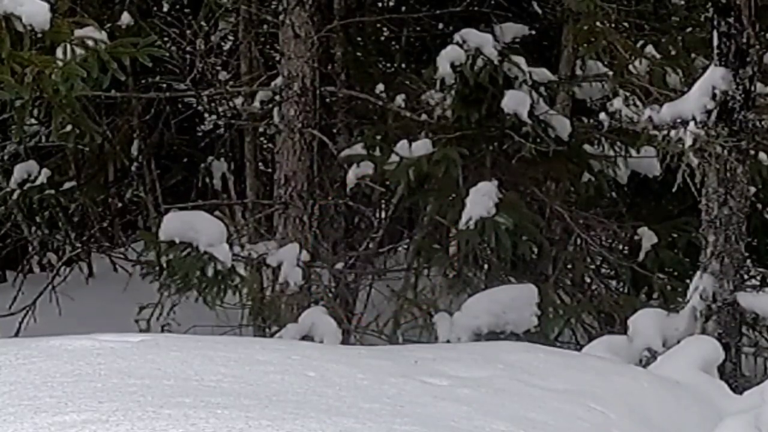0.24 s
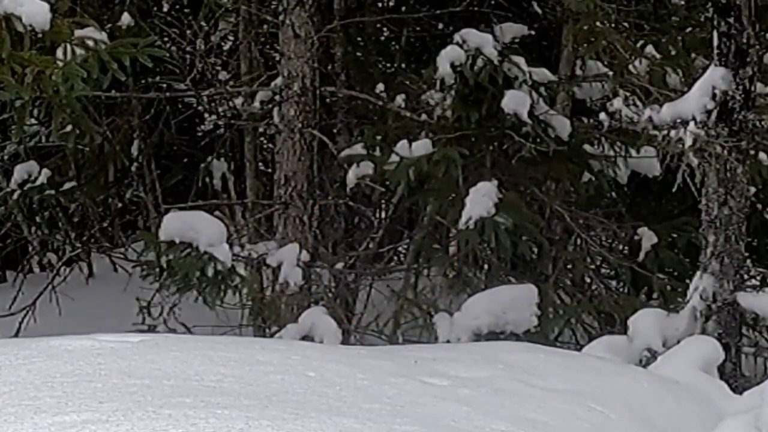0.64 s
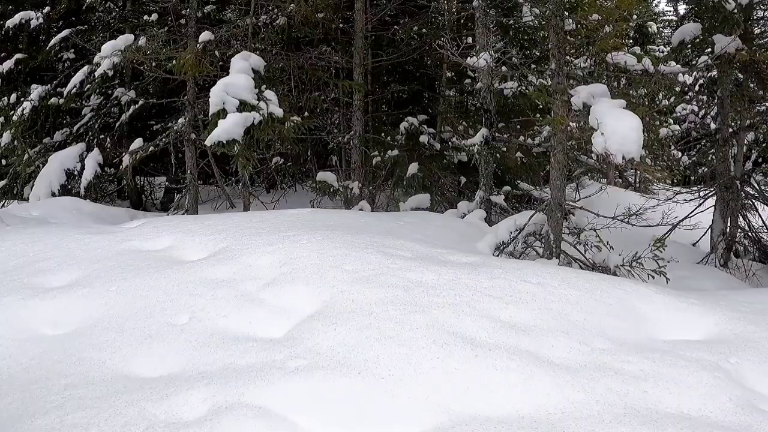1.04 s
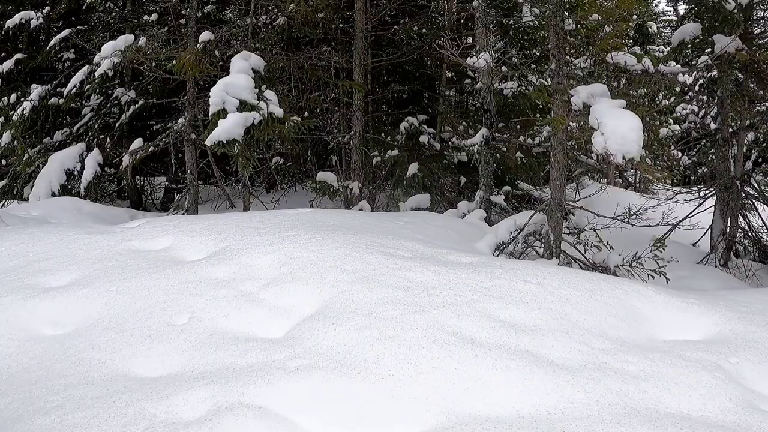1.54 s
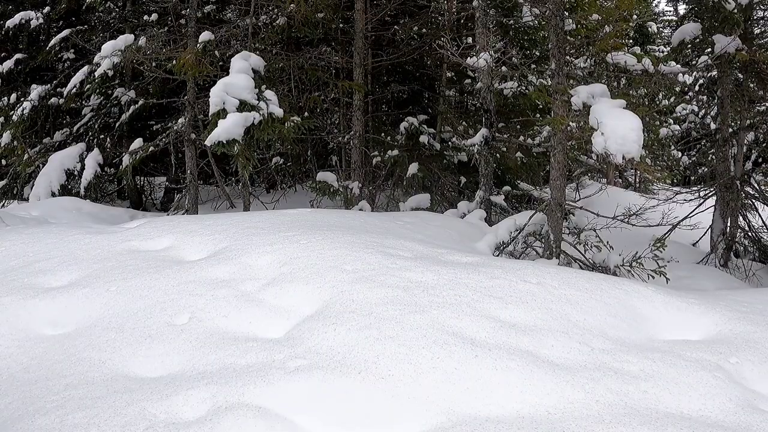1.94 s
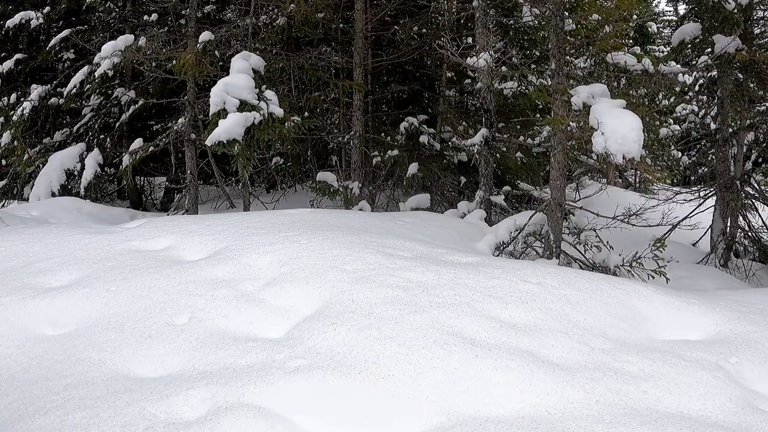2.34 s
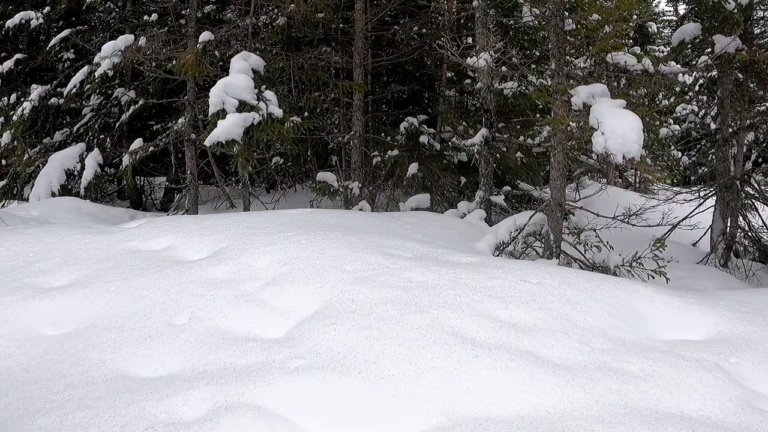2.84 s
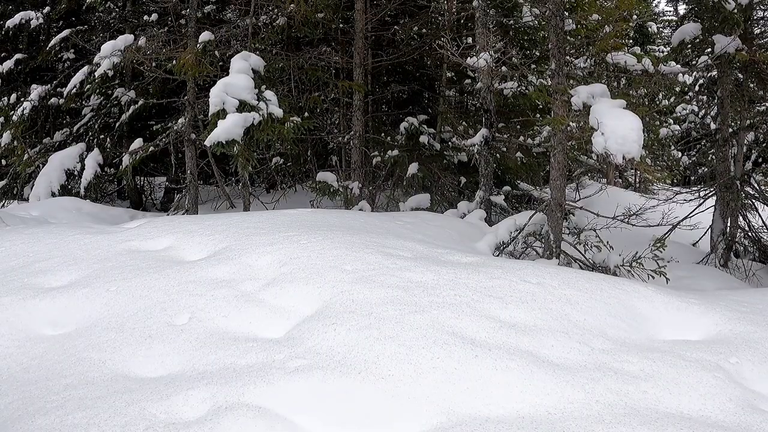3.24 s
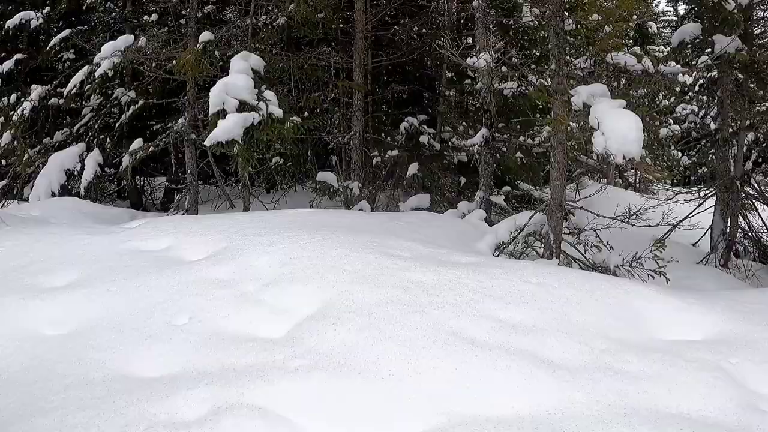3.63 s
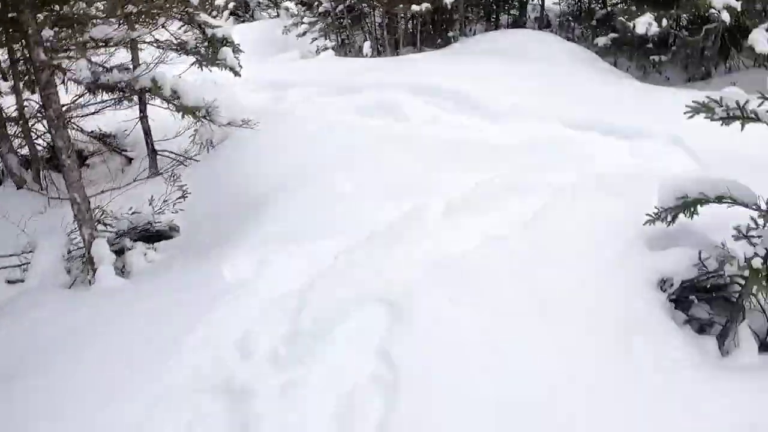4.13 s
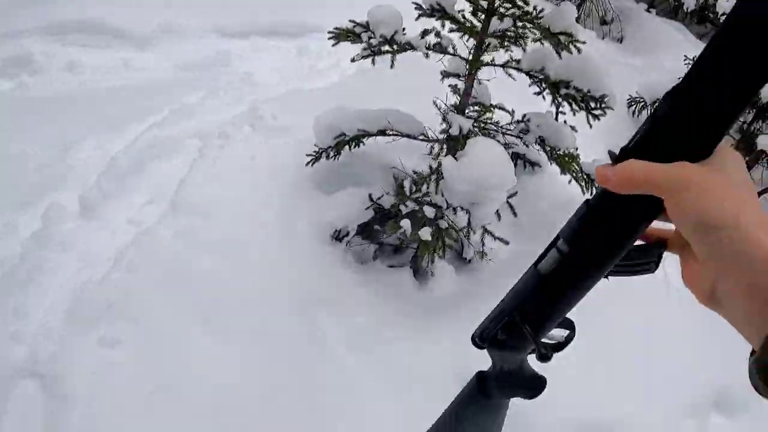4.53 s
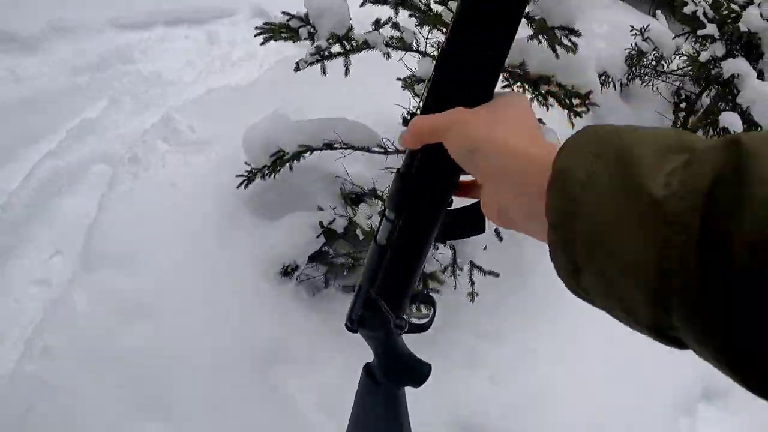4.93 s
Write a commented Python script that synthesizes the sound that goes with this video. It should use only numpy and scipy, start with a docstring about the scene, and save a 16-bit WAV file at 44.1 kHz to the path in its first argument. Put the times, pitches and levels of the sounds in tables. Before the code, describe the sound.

Close, sharp metal clicks and scrapes of a rifle action over soft cloth rustle, then a sudden cut to loud wading through snow.

```python
"""Still, snowy woods: close to a small camera, a rifle bolt is worked open and shut twice.
Clicks and scrapes ring the modes of the metal and stock; the trees return a short echo as fading noise.
Grainy noise makes coat cloth rustle, and slow, low noise is air buffeting the microphone.
After a cut the wearer wades through deep snow: rumble, crunching bursts of grains, pops and dull knocks."""
import sys
import numpy as np
from scipy import signal
from scipy.fft import rfft, irfft
from scipy.io import wavfile
from scipy.ndimage import uniform_filter1d

SR = 44100
rng = np.random.default_rng(int(sys.argv[2]) if len(sys.argv) > 2 else 0)


def wav_record(signal):
    """Record a signal, one row per channel, as 16-bit PCM in the file named by sys.argv[1]."""
    frames = np.transpose(np.atleast_2d(signal))
    bounded = np.clip(frames, -1, 1)
    # unit amplitude maps onto the largest positive 16-bit level
    quanta = np.round(bounded * 32767).astype(np.int16)
    wavfile.write(sys.argv[1], SR, quanta)


N = 228321
T = np.arange(N) / SR

# where the near sounds sit: (time [s], left minus right [dB], basic width as side over mid [ratio])
STAGE = [(0, 0, .1), (1.0, 0, .08), (1.5, -1, .12), (2.0, 0, .3), (2.7, 2, .4), (3.6, 1.5, 0.5),
         (3.945, 0, .45), (3.955, 1, .3), (4.2, 0, .2), (5.18, 0, .1)]
# cloth, and snow after the cut: (time [s], rustle [dB], low crunch [dB], treble [dB])
RUSTLE_LEVELS = [
    [(0, -62.5, -108, -79.5), (.234, -71, -82.5, -85), (.5, -70, -75, -76), (.766, -77, -82.5, -81),
     (1.1, -70, -75, -76.5), (1.55, -73, -90, -81.5), (1.756, -90.5, -88.5, -93.5), (1.95, -89.5, -93, -92),
     (2.15, -76.5, -80, -76), (2.43, -76.5, -83, -81), (2.65, -70.5, -74.5, -77),
     (2.806, -63.5, -67, -71.5), (2.9, -65.5, -73, -75.5), (2.92, -73.5, -89.5, -79.5),
     (3.182, -74, -77.5, -75.5), (3.5, -77, -77, -80), (3.852, -73, -74, -76.5), (3.945, -69, -66.5, -72.5)],
    [(3.955, -65, -53.5, -63.5), (4.095, -47, -42.5, -58.5), (4.16, -55.5, -50, -62),
     (4.419, -52, -48.5, -62), (4.53, -49, -51, -55), (4.62, -42, -40, -51.5), (4.77, -57, -46, -60),
     (4.92, -55.5, -50, -65.5), (5.12, -50.5, -53, -55.5)],
]
# ways the receiver, bolt and stock can ring: (pitch [Hz], level [dB], free ring time to -60 dB [s])
RIFLE_MODES = [(456, -5.5, 0.079), (560, 2.5, 0.037), (626, -9.5, 0.014), (1030, -21.5, 0.14),
               (1095, 5.5, 0.041), (1140, -8.5, 0.05), (1630, -11.5, .045), (1670, -2.5, 0.027),
               (1873, 2, 0.038), (2237, -14.5, 0.021), (2682, 1.5, .04), (3016, 3.5, 0.065),
               (3630, -6.5, 0.0083), (4041, 4.5, 0.023), (4500, 3, 0.016), (4790, 2.5, 0.016),
               (5930, 4, 0.0067), (6370, 1, 0.0061), (6820, -2.5, .02), (7120, 4.5, 0.055),
               (8115, 3, 0.025), (8870, -8, 0.033), (9750, 3.5, .015), (10800, -11.5, 0.014),
               (11500, -10.5, .012)]
# two cuts of the edit: (time [s], half length of the silence [s])
CUTS = [(.9365, .0055), (3.949, .002)]
SNOW_START_S = CUTS[1][0]


def undb(db):
    """Turn decibels into a plain gain."""
    return 10 ** (np.asarray(db, float) / 20)


def unit(x):
    """Scale to an average (RMS) level of 1."""
    return x / np.sqrt(np.mean(x ** 2))


def column(table, order, s):
    """Read one table column at time s, with straight lines between the rows."""
    rows = np.array(table)
    return np.interp(s, rows[:, 0], rows[:, order])


def curve(tables, order):
    """Gain over time along one dB column of joined tables."""
    return undb(column(np.vstack(tables), order, T))


def band(x, lo_hz, hi_hz):
    """Keep mainly the sound between two pitches."""
    return signal.sosfilt(signal.butter(2, [lo_hz, hi_hz], "band", fs=SR, output="sos"), x)


def shaped(x, tone):
    """Colour a sound by (pitch [Hz], gain [dB]) points."""
    hz, db = np.transpose(tone)
    f = np.arange(x.shape[-1] // 2 + 1) * SR / x.shape[-1] + 1
    gain = undb(np.interp(np.log(f), np.log(hz), db))
    return irfft(rfft(x) * gain, x.shape[-1])


def ring(x, hz, t60):
    """One mode, struck by x, that falls 60 dB in t60 seconds."""
    pole = np.exp(2j * np.pi * hz / SR - np.log(1000) / (t60 * SR))
    return signal.lfilter([1], [1, -pole], x).imag


def walk(rate):
    """Smooth random wandering with RMS 1, from new random values at this rate per second."""
    k = int(SR / rate)
    steps = np.repeat(rng.standard_normal(N // k + 1), k)
    return unit(uniform_filter1d(uniform_filter1d(steps, k), k)[:N])


def grit(scatter_db, spread):
    """Noise of tiny grains with uneven sizes, placed and widened by the stage."""
    chance = np.repeat(rng.exponential(size=N // 24 + 1), 24)[:N]
    size = undb(np.minimum(scatter_db * chance, 9))
    mid, side = rng.standard_normal((2, N)) * size
    side = side * spread * column(STAGE, order=2, s=T)
    pan_db = column(STAGE, order=1, s=T) / 2
    return np.array([(mid + side) * undb(pan_db), (mid - side) * undb(-pan_db)])


def add(out, s, x, pan_db):
    """Mix x in at s seconds, pan_db louder on the left than on the right."""
    i = int(s * SR)
    x = x[..., :N - i]
    out[:, i:i + x.shape[-1]] += x * undb([[pan_db / 2], [-pan_db / 2]])


def rustle():
    """Grains of cloth and packed snow in three registers, each flickering."""
    # colour of the middle register: (pitch [Hz], gain [dB])
    rustle_tone = [(350, -28.5), (600, -6), (832, -9.5), (1020, -0.5), (1280, -2.5), (1500, -1), (2180, -6),
                   (3400, -13), (4420, -35), (7480, -120)]
    # colour of the treble: (pitch [Hz], gain [dB])
    treble_tone = [(1650, -30.5), (2800, -7.5), (3260, -4), (4500, -2.5), (7550, -9), (9400, -18.5),
                   (12400, -21.5), (14100, -27), (16000, -70)]
    low = unit(band(grit(0.17, 0.42), 140, 620)) * undb(2.0 * walk(25))
    mid = unit(shaped(grit(0.66, 1.0), rustle_tone)) * undb(2.0 * walk(14))
    top = unit(shaped(grit(1.3, 1.2), treble_tone)) * undb(0.8 * walk(30))
    mid = curve(RUSTLE_LEVELS, order=1) * mid
    low = curve(RUSTLE_LEVELS, order=2) * low
    return mid + low + curve(RUSTLE_LEVELS, order=3) * top


def buffet():
    """Air and movement press on the microphone: gusty low noise, nearly the same on both sides."""
    # level before the gusts sway it: (time [s], rumble [dB], upper rumble [dB])
    buffet_levels = [
        [(0, -72, -100), (.13, -58.5, -105), (.19, -79, -102), (.42, -88, -95), (.6, -55, -87),
         (.77, -71.5, -102), (.91, -55, -86), (1.13, -61, -79), (1.38, -53, -74), (1.55, -57, -83.5),
         (1.82, -46.5, -83), (2.03, -52, -84.5), (2.26, -52, -83.5), (2.45, -67.5, -79), (2.6, -68.5, -77.5),
         (2.72, -55.5, -76.5), (3.04, -54, -82.5), (3.35, -66.5, -80.5), (3.55, -57.5, -76.5),
         (3.72, -68.5, -80.5), (3.947, -70, -79)],
        [(3.951, -42, -70), (3.981, -33, -59), (4.101, -39.5, -30.5), (4.175, -29, -38.5), (4.23, -34.5, -44),
         (4.27, -47, -44.5), (4.4, -46, -50), (4.485, -35.5, -58), (4.56, -69, -70), (4.62, -43, -44),
         (4.791, -43.5, -44), (4.839, -62, -81), (4.937, -56.5, -75), (5.177, -45, -64)],
    ]
    gust_db, gusts_per_s = 2.5, 16  # how far and how often the level sways
    mid, side = rng.standard_normal((2, N))
    air = mid + 0.17 * np.array([side, -side])
    # the rumble sits higher once the snow begins
    deep = np.where(T < SNOW_START_S, unit(band(air, 18, 48)), unit(band(air, 32.3, 81.6)))
    deep = deep * undb(gust_db * walk(gusts_per_s))
    upper = unit(band(air, 66, 150)) * undb(gust_db * walk(gusts_per_s))
    return curve(buffet_levels, order=1) * deep + curve(buffet_levels, order=2) * upper


def microphone_hiss():
    """Each microphone's own noise: a faint, steady hiss, separate on each side."""
    return undb(-93.5) * band(rng.standard_normal((2, N)), 2000, 15000)


def knocks():
    """Soft blows through the camera body ring two low, heavily damped modes under a short snap."""
    # (time [s], peak of the body [dB], pitch [Hz], snap against body [dB])
    knock_rows = [(0.176, -61, 530, -8), (.187, -58, 726, 6.5), (4.027, -33.5, 140, -8),
                  (4.061, -26, 143, -35), (4.094, -25, 129, -6), (4.104, -24.5, 386, -15),
                  (4.153, -37, 140, 5), (4.252, -41, 128, 0), (4.514, -31, 403, -19),
                  (4.543, -16.5, 286, -3.5), (4.552, -20, 127, -10), (4.599, -17, 343, 4.5),
                  (4.608, -27, 132, -16), (4.874, -30.5, 333, -24), (4.883, -35, 486, -10),
                  (4.912, -30.5, 647, -23), (4.918, -28.5, 560, -21), (4.924, -14, 475, -21),
                  (5.027, -29, 347, -5.5), (5.13, -14.5, 253, -10), (5.137, -12.5, 244, -29)]
    floor_s, ring_cycles = 0.0095, 3.8  # ring time is a floor plus some cycles of the pitch
    out, t = np.zeros((2, N)), np.arange(SR // 8) / SR
    for s, peak_db, hz, snap_db in knock_rows:
        push = np.hanning(int(0.45 * SR / hz) + 2)
        push = np.pad(push, (0, len(t) - len(push)))
        t60 = floor_s + ring_cycles / hz
        body = ring(push, hz, t60) + undb(-8) * ring(push, 2.17 * hz, 0.48 * t60)
        body = band(body, 0.42 * hz, 4700)
        snap = band(rng.standard_normal(len(t)) * t * np.exp(-t / 0.00118), 550, 1700)
        blow = body / np.abs(body).max() + undb(snap_db) * snap / np.abs(snap).max()
        add(out, s, undb(peak_db) * blow, 0)
    return out


def bolt_clicks():
    """A few ms of chattering contact makes a crack and rings the modes of the rifle."""
    # (time [s], level [dB], stock knock at 500 Hz [dB], ring at 1.1 kHz [dB], metal at 2.8 kHz [dB],
    #  treble fall from 2.8 to 10 kHz [dB per octave], left minus right [dB], contact time scale [ms])
    click_rows = [(1.0233, -12.5, -41.5, -2.5, -8, 0.5, 0.5, 1.5),
                  (1.0568, -16.5, -14.5, -5, 1, 8, 0, 1.27), (1.063, -21.5, -8.5, -11.5, -9, 12, 0, 2.26),
                  (1.203, -42.5, -45.5, 0.5, -15.5, 17, 0, 1.13), (1.283, -39, -24.5, -6, -11, 5, 2, 1.9),
                  (1.297, -38.5, -14, -11, -11, 1, 1, 1.2), (1.339, -33.5, -29, -9.5, -6.5, -0.5, 1, 2.1),
                  (1.3624, -33, -41, -10.5, 2, 9, -0.5, 0.71), (1.3762, -6.5, -30, -7.5, -7.5, 7, 1, 0.97),
                  (2.0993, -35, -13.5, -10.5, -22, 4.5, 4, 3.4), (2.137, -43.5, -19, -9, -7, 4.5, 2.5, 3.2),
                  (2.1553, -37, -37, -27, -8.5, -1, 9, 1), (2.1708, -26, -23.5, -7.5, -4.5, 2, 4, 3.2),
                  (2.1875, -30.5, -32.5, -13, -17, 4, 9.5, 2.1),
                  (2.1964, -41.5, -46, 16.5, 2.5, 3, 4.5, 4.3),
                  (2.2067, -18.5, -7.5, 6, -3.5, 9.5, 1.5, 1.34),
                  (2.2127, -24, 3, -32.5, -17.5, 13, 1.5, 1.67), (2.2264, -42.5, -5, -9, -3, 8.5, -6, 2.1),
                  (2.464, -8, -40, -1, -6, 8, 5, .9), (2.469, -16, -15.5, 0, -11, 11.5, 2, 0.65),
                  (2.5125, -15, -4, -2.5, -14, 8, 1.5, 1.12), (3.669, -27, -23.5, -1, -6.5, -0.5, 3, 2.34),
                  (3.692, -52.5, -24, -6, 0, 0.5, 1, 3.8), (3.914, -54.5, -2, -9, -13, 5, 5, 1.4),
                  (3.9272, -42.5, -8.5, -24, -15, 6.5, 7, 1.07), (4.255, -43, -20, 4, -21, 7, 0, 1.1),
                  (4.5978, -15, -0.5, -6, -7.5, 18, 0, 0.96), (4.977, -24.5, -34, -14, 0.5, 11, 0, 2.83)]
    # pitches at which each click is coloured: [Hz]
    colour_hz = (170, 500, 1100, 1700, 2800, 10000, 16000)
    butt_db, air_db = -38.5, -14  # weight at 170 Hz; further loss from 10 to 16 kHz
    ring_share = 0.48  # share of the free ring time left by the hands
    lean_db = 6  # typical lean of a mode to one side at full width
    lead = 300  # samples of room ahead of the blow for the colour filter
    out, t = np.zeros((2, N)), np.arange(SR // 7) / SR
    hz, db, t60 = np.transpose(RIFLE_MODES)
    opposite = np.array([[1], [-1]])
    for s, level_db, stock, low, bright, fall, pan, contact_ms in click_rows:
        width = column(STAGE, order=2, s=s)
        u = t * 1000 / contact_ms
        push = u ** 2 * np.exp(-u) * rng.standard_normal(len(t))
        # the grip of the hands detunes every mode a little, and each one radiates to its own side
        detune, lean = rng.standard_normal((2, len(hz)))
        held_hz = hz * (1 + 0.025 * detune)
        parts = np.array([ring(push, f, d * ring_share) for f, d in zip(held_hz, t60)])
        parts *= (undb(db) / np.abs(parts).max(axis=1))[:, None]
        crack = undb(5.0) * band(push, 600, 11000) / np.abs(push).max()
        sides = undb(opposite * lean_db * width * lean) @ parts + crack
        # loose parts rattle on as a diffuse hiss
        noise = shaped(rng.standard_normal((2, len(t))), [(1000, -2.5), (6000, 5), (12000, -4)])
        loose, aside = noise * np.minimum(u / 3, 1) * np.exp(-t / 0.033)
        aside = shaped(aside, [(2000, 2), (8000, 4), (13000, 14)])
        sides += undb(-12) * (loose + opposite * width * aside)
        # sound from the left reaches the right side later, by one sample at most
        sides[1] = np.roll(sides[1], round(column(STAGE, order=1, s=s) / 3))
        core = np.abs(band(sides[0], 1400, 3200)).max()
        top = bright - fall * np.log2(colour_hz[5] / colour_hz[4])
        gains_db = [butt_db, stock, low, 0, bright, top, top - 0.53 * fall + air_db]
        coloured = shaped(np.roll(sides, lead, axis=1), list(zip(colour_hz, gains_db)))
        add(out, s - 0.002 - lead / SR, coloured * undb(level_db) / core, pan)
    return out


def bolt_slides():
    """The bolt scrapes along its raceway: gritty noise drives the rifle's modes."""
    # (start [s], end [s], scrape at start [dB], scrape at end [dB], treble at start [dB], treble at end [dB])
    slide_rows = [(1.038, 1.051, -35, -44, -36.5, -34), (1.306, 1.37, -52.5, -48, -70, -38.5),
                  (2.153, 2.202, -50, -49, -54.5, -41.5), (2.472, 2.51, -40, -59, -42.5, -58.5)]
    sag_db = 7.5  # the scrape eases in mid stroke
    out = np.zeros((2, N))
    scrape = band(grit(1.5, 0)[0], 450, 15000)
    modes = [undb(db) * unit(ring(scrape, hz, 0.5 * t60)) for hz, db, t60 in RIFLE_MODES]
    dull = unit(sum(modes[:12]) + 2.7 * unit(band(scrape, 710, 3300)))
    bright = unit(sum(modes[12:]) + 2.2 * unit(band(scrape, 2100, 19000)))
    for start, end, dull_from, dull_to, bright_from, bright_to in slide_rows:
        way = np.clip((T - start) / (end - start), 0, 1)
        on = uniform_filter1d(1.0 * ((T > start) & (T < end + 0.004)), size=200)
        on = on * undb(-sag_db * np.sin(np.pi * way))
        dull_gain = undb(dull_from + (dull_to - dull_from) * way)
        bright_gain = undb(bright_from + (bright_to - bright_from) * way)
        out += on * (dull_gain * dull + bright_gain * bright)
    return out


def stock_thuds():
    """The butt of the stock booms with some of the bolt's blows: one low, fading tone."""
    # (time [s], level [dB])
    thud_rows = [(1.063, -47), (1.377, -42.5), (2.206, -47.5), (2.465, -55.5), (2.513, -38.5), (3.675, -51)]
    thud_hz, t60 = 176, 0.064  # ring time in s
    out, t = np.zeros((2, N)), np.arange(SR // 8) / SR
    fade = np.minimum(t / 0.0014, 1) * np.exp(-np.log(1000) * t / t60)
    boom = np.sin(2 * np.pi * thud_hz * t) * fade
    for s, level_db in thud_rows:
        add(out, s, undb(level_db) * boom, 1.5)
    return out


def bolt_squeak():
    """A faint squeak: a tone that glides upward with shaky pitch and level."""
    start, end, fade_s = 1.275, 1.375, 0.012
    glide_hz = np.exp(np.interp(T, (start, end), np.log((368, 930))))
    phase = 2 * np.pi * np.cumsum(glide_hz * (1 + 0.07 * walk(300))) / SR
    fade = np.clip(np.minimum(T - start, end - T) / fade_s, 0, 1) ** 2
    return fade * undb(-58 + 4.5 * walk(150)) * np.sin(phase)


def catch_spring():
    """A small spring part sings on after the catch is flicked: unsteady, fading tones."""
    # (time [s], pitch [Hz], level before wavering [dB], ring time to -60 dB [s])
    spring_rows = [(3.672, 1102, -48, 0.27), (3.671, 5680, -50.5, 0.19), (3.686, 7140, -56, 0.15),
                   (3.686, 6160, -55.5, 0.16)]
    out, t = np.zeros((2, N)), T[:SR // 2]
    for s, hz, level_db, t60 in spring_rows:
        tone = np.minimum(t / 0.00418, 1) * ring(1.0 * (t == 0), hz, t60)
        sway = undb(1.5 * walk(40)[:len(t)])
        flutter = 1 + 1.87 * (hz / 7000) ** 2 * walk(700)[:len(t)]  # stronger on high tones
        add(out, s, undb(level_db) * tone * sway * flutter, 1.5)
    return out


def bolt():
    """All sounds of the working bolt, with the deep bass taken out."""
    out = bolt_clicks() + bolt_slides() + bolt_squeak() + catch_spring()
    return signal.sosfilt(signal.butter(3, 100, "high", fs=SR, output="sos"), out)


def trees(x):
    """Scattered echo from trunks, blurred in pitch; its treble is weaker but lasts slightly longer."""
    echo_db, t60, split_hz = -25, 0.2, 3630  # ring time in s, of the part below the split
    t = np.arange(SR // 2) / SR
    mid, side = rng.standard_normal((2, len(t)))
    tail = (mid + 0.51 * np.array([side, -side])) * np.minimum(t / 0.012, 1)
    dull = band(tail, 450, split_hz) * np.exp(-np.log(1000) * t / t60)
    treble = undb(-6.5) * band(tail, split_hz, 11000) * np.exp(-np.log(1000) * t / (1.16 * t60))
    tail = dull + treble
    tail = tail / np.sqrt(np.sum(tail[0] ** 2))
    return undb(echo_db) * signal.fftconvolve(x * walk(900), tail, axes=1)[:, :N]


def crackle():
    """After the cut, lone grains pop out of the packed snow, each a short damped ring."""
    crackle_db, crackles_per_s = -3.5, 260  # level against the rustle
    when, size, pitch = rng.random((3, N))
    in_snow = T > SNOW_START_S
    pops = (when < crackles_per_s / SR) * undb(-4.0 * np.log(size + 0.039)) * in_snow
    # share the pops out among five pitches
    edges = np.linspace(0, 1, 6)
    heard = np.zeros(N)
    for a, b, hz in zip(edges, edges[1:], (620, 1080, 1960, 3030, 4200)):
        heard += ring(pops * (pitch >= a) * (pitch < b), hz, 6.6 / hz)
    heard = band(heard, 360, 7000)
    heard = heard / heard[in_snow].std()
    pan = undb(np.outer([0.5, -0.5], column(STAGE, order=1, s=T)))
    return undb(crackle_db) * curve(RUSTLE_LEVELS, order=1) * heard * pan


def crunches():
    """Snow gives way and cloth drags over cloth: bursts of grains that swell fast and crumble away."""
    # (time [s], level [dB], low offset [dB], treble offset [dB], time from start to fullest swell [ms])
    crunch_rows = [(3.957, -46, -7, -22, 5.7), (3.967, -45, -1, -12, 4.4), (4.029, -36, 9.5, -6, 3.4),
                   (4.097, -29, 3.5, -16.5, 8.9), (4.153, -38.5, 5, -9, 15.4), (4.253, -35.5, 5, -13, 7.6),
                   (4.304, -38, 5.5, -13, 9.3), (4.424, -39.5, 5.5, -5.5, 16.4), (4.467, -42, 7, -5, 13),
                   (4.629, -50, -6, -18, 8.5), (4.673, -30, 1, -11.5, 15), (4.705, -44, -8, -8, 4.9),
                   (4.763, -34.5, 3.5, -8.5, 7.2), (4.783, -38.5, -19, -8.5, 8.5),
                   (4.923, -31.5, 18.5, -9.5, 3.8), (4.966, -30, 1, -15, 6.3), (5.13, -18.5, 5.5, -41, 4.8),
                   (5.155, -31.5, -1.5, -12.5, 8.6)]
    out, t = np.zeros((2, N)), np.arange(SR // 8) / SR
    for s, level_db, low_db, top_db, swell_ms in crunch_rows:
        u = t * 1000 / swell_ms
        chance = np.repeat(rng.exponential(size=len(t) // 16 + 1), 16)[:len(t)]
        grains = rng.standard_normal(len(t)) * undb(np.minimum(3.5 * chance, 11))
        tone = [(120, low_db - 31), (450, low_db + 4.5), (1500, 0),
                (5000, top_db - 0.5), (14000, top_db - 37)]
        burst = shaped(unit(grains) * u * np.exp(1 - u), tone)
        add(out, s - 0.002, undb(level_db) * burst, 0)
    return out


def scene():
    """Mix every layer; only the bolt gets an echo from the trees."""
    rifle = bolt()
    near = rustle() + buffet() + microphone_hiss() + knocks()
    return near + rifle + stock_thuds() + trees(rifle) + crackle() + crunches()


def record(dry):
    """The stereo image narrows at times, the edit leaves gaps of a few ms and the top is cut."""
    # how much left-right difference remains: (time [s], side gain [dB])
    image = [(0, -1), (.25, -22), (.94, -25), (1.0, -0.5), (4.1, 0), (4.3, -10.5), (4.55, -42), (5.18, -45)]
    mid = (dry[0] + dry[1]) / 2
    side = (dry[0] - dry[1]) / 2 * curve([image], order=1)
    gate = np.ones(N)
    for s, half in CUTS:
        gate *= np.clip((np.abs(T - s) - half) / 0.0015, 0, 1)  # 1.5 ms fade on each side
    top_cut = signal.ellip(8, 0.2, 70, 16100, fs=SR, output="sos")
    return signal.sosfilt(top_cut, np.array([mid + side, mid - side]) * gate)


dry = scene()
out = record(dry)
wav_record(out)
```